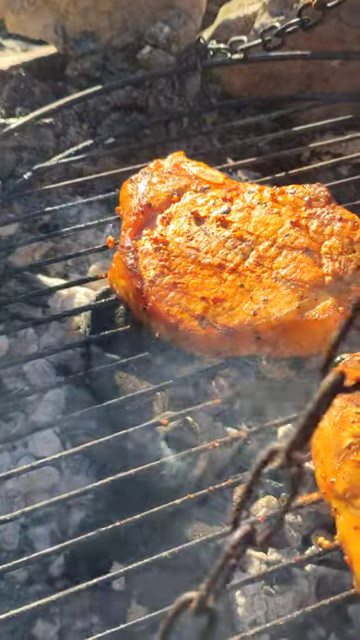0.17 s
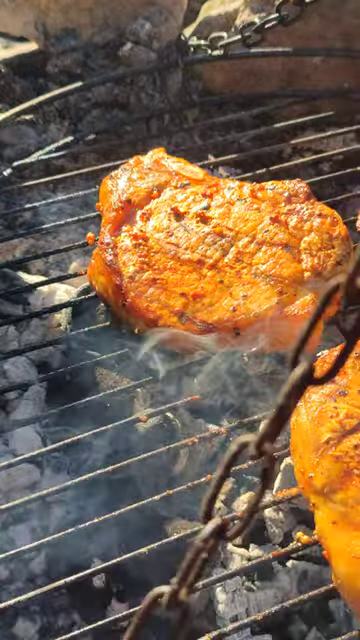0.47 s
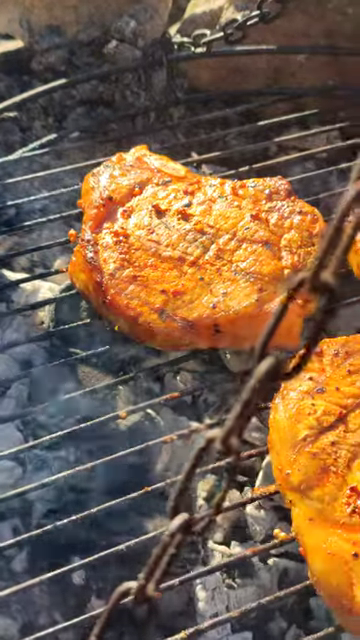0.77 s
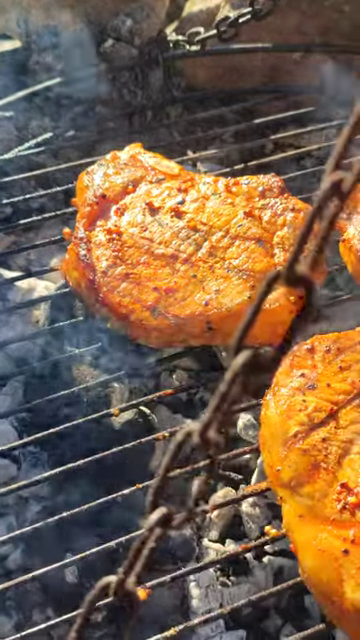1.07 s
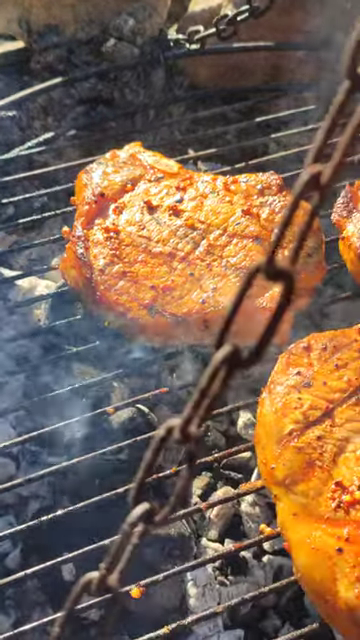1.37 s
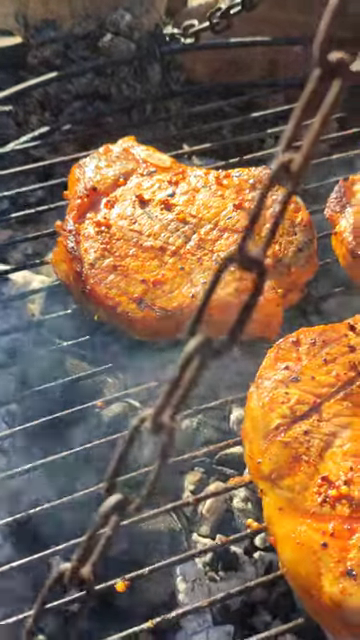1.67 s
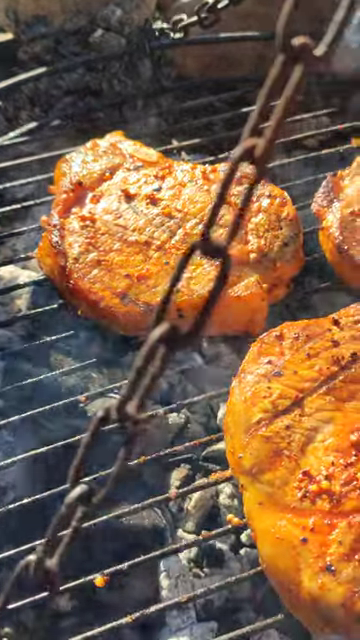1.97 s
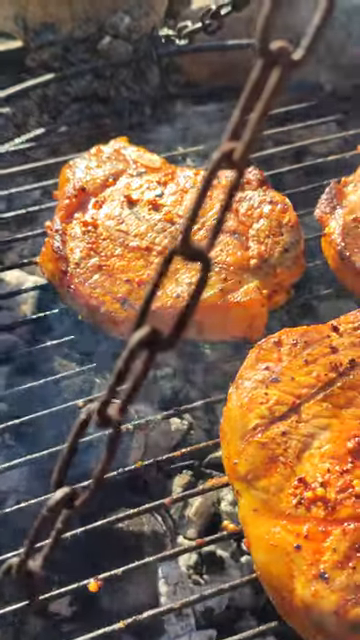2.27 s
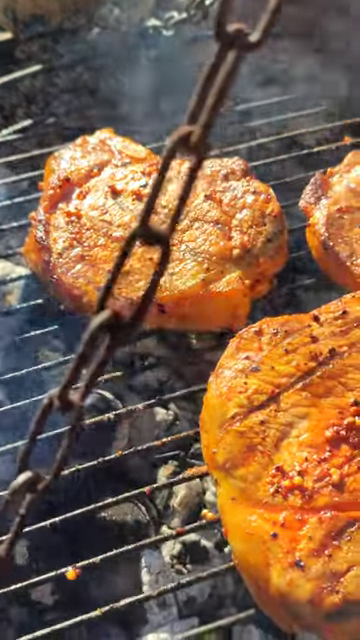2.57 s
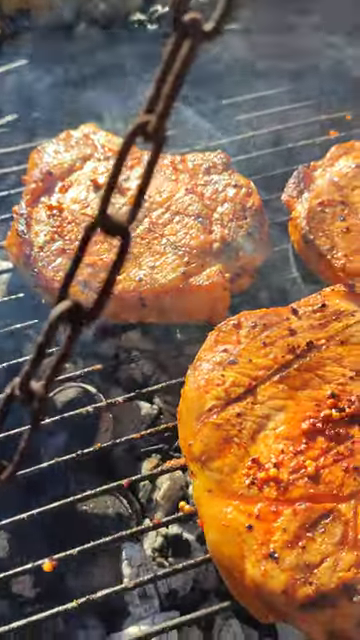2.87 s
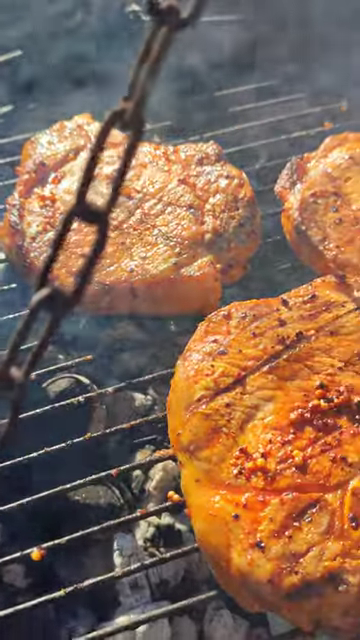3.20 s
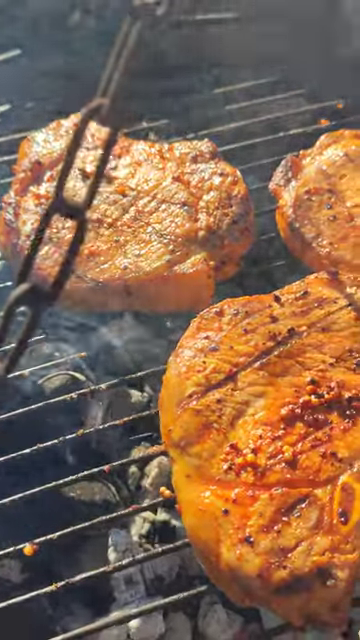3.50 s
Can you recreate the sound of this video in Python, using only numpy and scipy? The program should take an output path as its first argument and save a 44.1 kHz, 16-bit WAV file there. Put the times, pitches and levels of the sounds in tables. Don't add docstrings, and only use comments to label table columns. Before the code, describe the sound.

Meat sizzles on a charcoal grill outdoors, close to a stereo phone. After near silence until 0.1 s, it fades in by 0.35 s with a soft low thump. Fine bright fizz and crackle swell until about 1 s, with dense pops, sharpest at 0.55. Sizzle eases at 1.4-2.1, with sparser snaps, then revives from 2.3; a duller strong pop lands at 2.53, more around 2.8-3.15. Faint traffic rumbles throughout.

```python
import sys
import numpy as np
from scipy import signal
from scipy.fft import rfft, irfft, next_fast_len
from scipy.io import wavfile
from scipy.ndimage import uniform_filter1d, minimum_filter1d, map_coordinates

SR = 44100
rng = np.random.default_rng(int(sys.argv[2]) if len(sys.argv) > 2 else 0)


def how_loud(loudness_db):
    steps = np.asarray(loudness_db, float) / 20
    return 10 ** steps


def pcm_store(signal):
    levels = np.round(np.clip(np.atleast_2d(signal), -1, 1) * 32767)
    wavfile.write(sys.argv[1], SR, levels.astype(np.int16).T)


N = 160524

# time in seconds, strength in dB.
FRYING = [(.1, -59), (.25, -62), (.325, -60.5), (.36, -56), (.52, -57), (.7, -55.5), (.93, -57),
          (.97, -58.5), (1.3, -59), (1.44, -61.5), (1.7, -61.5), (2.149, -60.5), (2.33, -57), (2.45, -56.5),
          (2.7, -58.5), (2.95, -57), (3.2, -59.5), (3.32, -57.5), (3.55, -59)]
# frequency in Hz, level in dB.
FIZZ_COLOUR = [(500, -39), (1400, -15.5), (2100, -5), (4000, 1.5), (8000, -1.5), (12000, -0.5),
               (16000, -0.5)]
# centre in Hz, width in Hz, height in dB.
SINGING_BAND = [(7260, 1700, 21.5)]
# time in seconds, peak in dB, left over right in dB,
# treble above the air corner in dB, low body in dB.
BIG_POPS = [(0.3508, -32.5, 2, -1.5, 9), (0.441, -39, 0, -3, 1), (0.4799, -35.5, -1.5, -9, 3),
            (0.5468, -21.5, -3.5, 4.5, -5), (0.579, -30, 0, 6, 3), (0.6594, -33.5, -6, -3, -3),
            (0.6811, -31.5, -8, 1, -3), (0.6873, -34.5, -5, 3, -3), (0.7095, -42, -3, -4, 0),
            (0.7123, -30, -5, 0, 7), (0.7633, -28, -5.5, -1.5, 8), (0.7654, -34, 0, -2, 2),
            (1.2737, -29, 2, 6, 14.5), (1.2755, -32, -7, 8, 8), (1.366, -26.5, -1, 1.5, 1),
            (1.8626, -32.5, 1, 4, 0), (1.9666, -33, 12, 10, -5), (2.436, -34, 2, 3, 0),
            (2.4436, -28, -5, -4, 2), (2.4612, -29.5, 2, -4.5, 2), (2.526, -22, -2, -15, 0.5),
            (2.7934, -35, 7, 2, 0), (2.825, -30, 2, -3.5, 3), (2.8351, -32, -4, 0, -2),
            (2.973, -31.5, -4, -0.5, -2), (3.015, -26.5, -2.5, 0, -5), (3.072, -35.5, -10, 3, -3),
            (3.152, -36.5, -7, -1.5, -6), (3.6076, -35, -1, -1, 0)]
# time in seconds, peak in dB, brightness in dB per octave.
SMALL_POPS_EARLY = [(.1035, -33.5, 1), (.203, -39, -3.5), (.278, -40, -5), (.338, -48, -16), (.416, -38, 7),
                    (.526, -51, -8), (.584, -37, -4), (.597, -32, -1), (.612, -33.5, -5.5), (.622, -39, -5),
                    (.646, -42, -6), (.670, -42, 0), (.730, -49, 4), (.823, -41, -9), (.872, -39, -1.5),
                    (.915, -38, -4.5), (.980, -37, 4), (1.170, -44, -1), (1.228, -37.5, 2), (1.246, -43, 4),
                    (1.414, -46, 6), (1.432, -51, -2), (1.654, -43, -7), (1.659, -47, -1),
                    (1.845, -39, 1.5), (1.875, -38, -3)]
# time in seconds, peak in dB, brightness in dB per octave.
SMALL_POPS_LATE = [(2.051, -40, -6), (2.237, -40.5, -1), (2.372, -36.5, 0), (2.391, -42, 6),
                   (2.453, -40, 3), (2.470, -37, -1), (2.533, -48, 0), (2.586, -41, -2),
                   (2.659, -43.5, -7.5), (2.731, -37, -1), (2.745, -36.5, 3), (2.818, -36, -2),
                   (2.900, -44, -4), (2.962, -44, -4), (3.009, -38, -1), (3.025, -39, -2),
                   (3.089, -40, -1.5), (3.265, -39.5, -1.5), (3.313, -42.5, -3), (3.326, -36, 0),
                   (3.393, -39, 0), (3.435, -45, -7.5), (3.488, -44, 0), (3.621, -35.5, -2),
                   (3.629, -34.5, 2)]
# time in seconds, peak in dB, brightness in dB per
MORE_SMALL_POPS = [(.3557, -41, 1), (.3784, -42, 0), (.408, -39, 1), (.449, -44, 0), (.490, -45, 3), (.51, -40, 2),
                   (.5687, -42, 0), (.6362, -38, -7), (.7388, -40, -2), (.777, -45, -4), (.791, -40, -4),
                   (.8344, -44, -3), (.8464, -48, 6), (.8806, -40, -3), (.924, -44, -3), (.941, -46, -2)]
# frequency in Hz, level in dB.
POP_COLOUR = [(200, -18.5), (800, -13), (1400, -11), (2000, -3), (4000, 1), (8000, -0.5), (10500, -2.5),
              (14200, -5)]
# centre in Hz, width in Hz, height in dB.
LARGEST_CAVITY = [(600, 900, 6), (1400, 500, -6), (3150, 840, 5), (4860, 1800, -2), (7000, 460, -8),
                  (7600, 920, 6.5)]
# frequency in Hz, level in dB.
POP_EDGE = [(14100, 0.5), (15200, -36), (16000, -75)]
# centre in Hz, width in Hz, height in dB.
LEFT_PORT = [(2160, 1300, 5.5), (3180, 470, 4.5), (5520, 5400, 1), (6870, 1520, 5.5), (8370, 1300, 10.5),
             (13100, 3600, 4.5)]
# centre in Hz, width in Hz, height in dB.
RIGHT_PORT = [(2980, 1700, 4.4), (4300, 310, 0.53), (6160, 2480, 7.3), (7930, 810, 7.95),
              (12900, 5400, 3.6)]
# frequency in Hz, level in dB per Hz.
RUMBLE_COLOUR = [(8.8, -68), (15, 2), (35, -4), (59, -1.5), (214, -13), (255, -15.5), (303, -21),
                 (412, -21.5), (551, -24.5), (1500, -28.5), (1950, -35), (3300, -120)]
# centre in Hz, width in Hz, height in dB.
DRONES = [(54, 20, 3.5), (115, 19, 3.5), (249, 9.3, 2.5), (265.7, 13, 5.5), (432, 68, 2)]
# frequency in Hz, likeness from -1 to 1.
ALIKE = [(60, 0.93), (130, 1), (290, 0.75), (640, 0.6), (1410, -0.34), (3100, 1), (6820, -0.01),
         (15000, 0.0)]
# centre in Hz, width in Hz, extra chance (a factor).
HOLE_BANDS = [(3500, 2500, 4), (10000, 2000, 3)]
# height at full scale 1, time constant in seconds.
OFFSET = [
    (0.09, 0.15),
    (0.059, 0.07),
]
# time in seconds, jump at full scale 1.
JOLTS = [
    (0.085, 0.0014),
    (.145, -0.0057),
    (.205, -0.0033),
]


def fizz():
    own = rng.standard_normal((2, N))
    bubbles = crackle()
    hiss = how_loud(-2) * fizz_tone(steam(own))
    clicks = how_loud(-3.5) * fizz_tone(bubbles)
    both = how_loud(strength_db() - 0.7) * (hiss + clicks) + singing(bubbles, own)
    top_hz = 14300
    below_top = np.fft.rfftfreq(N, 1 / SR) < top_hz
    return irfft(rfft(coloured(both, ports_db)) * below_top, N)


def steam(own):
    shared_hz = 2270
    shared = coloured(rng.standard_normal(N), lambda hz: -10 * np.log10(1 + (hz / shared_hz) ** 4))
    hiss = patchy(own + 1.44 * shared, depth_db=3)
    return hiss * how_loud(0.32 * wobble(12) + 1.86 * wobble(40))


def crackle():
    per_s, size_spread_db, clump_db, spots = 900, 3.3, 3, 16
    chance, size, sign, place = rng.random((4, N))
    clumps = how_loud(clump_db * (0.46 * wobble(12) + wobble(30)))
    bursting = chance < per_s / SR * clumps
    sizes = bursting * how_loud(-size_spread_db * np.log(1 - .98 * size)) * np.sign(sign - .3)
    spot = (place * spots).astype(int)
    out = np.zeros((2, N))
    for k in range(spots):
        here = (sizes * (spot == k))[None]
        out += signal.oaconvolve(here, burst(t60=.006, scatter_db=-2.5, count=300), axes=1)[:, :N]
    return out


def singing(bubbles, own):
    from_db, level_db, grows = -56, -9.5, 1.06
    source = bubbles[::-1, ::-1] / 3 + 0.064 * own
    tiny = unit(coloured(source, lambda hz: bells(SINGING_BAND, hz)))
    return how_loud(from_db + level_db + (1 + grows) * (strength_db() - from_db)) * tiny


def fizz_tone(x):
    return unit(coloured(x, lambda hz: along(FIZZ_COLOUR, hz)))


def strength_db():
    s, db = np.transpose(FRYING)
    return np.interp(np.arange(N) / SR, s, db)


def pops():
    small = list(SMALL_POPS_EARLY) + list(SMALL_POPS_LATE) + list(MORE_SMALL_POPS)
    small = [(s, db, -3, 0, 0, tilt) for s, db, tilt in small]
    big = [(s + 0.00054, *rest, 0) for s, *rest in BIG_POPS]
    s, db, pan_db, air_db, body_db, tilt_db = np.transpose(big + small)

    t = np.arange(1400) / SR
    spray_db, spray_t60_s = -23, 0.027
    spray = how_loud(spray_db - 60 * t / spray_t60_s) * rng.standard_normal((len(s), 2, len(t))) * (t > .001)
    clicks = np.array([burst(t60=.009, scatter_db=-12, count=len(t)) for _ in s])
    grate_echo_s, grate_echo = .00042, .7
    clicks[:, 1, round(grate_echo_s * SR)] = grate_echo

    def column(values):
        return values[:, None, None]

    def pop_db(hz):
        body_hz, air_hz = 1700, 9000
        tilt = column(tilt_db) * np.log2((hz + 300) / 5000)
        body = column(body_db) / (1 + (hz / body_hz) ** 4)
        air = column(air_db) / (1 + (air_hz / (hz + 1)) ** 8)
        cavity = column(db == db.max()) * bells(LARGEST_CAVITY, hz)
        return along(POP_COLOUR, hz) + tilt + body + air + cavity + ports_db(hz)

    shaped = coloured(clicks + spray, pop_db)
    out = np.zeros((2, N + 4096))
    for start, level_db, lean_db, pop in zip(s, db, pan_db, shaped):
        gain = how_loud(level_db - 1 + lean(lean_db + 0.5))
        peak = np.abs(pop.mean(axis=0)).max()
        out[:, round(start * SR):][:, :len(t)] += gain * pop / peak
    edge = how_loud(along(POP_EDGE, np.fft.rfftfreq(N, 1 / SR)))
    return irfft(rfft(out[:, :N]) * edge, N)


def burst(t60, scatter_db, count):
    t = np.arange(count) / SR
    shape = how_loud(scatter_db - 60 * t / t60) * rng.standard_normal((2, count)) * (t > .00025)
    left_direct, left_lag_s = .6, .00055
    shape[:, 0] = left_direct, 1
    shape[0, round(left_lag_s * SR)] = 1
    return shape


def ports_db(hz):
    return np.array([bells(LEFT_PORT, hz), bells(RIGHT_PORT, hz) + 2])


def traffic():
    level_db, lean_db = -53, -0.7
    hz = np.fft.rfftfreq(N, 1 / SR)
    turn = np.arccos(np.clip(along(ALIKE, hz), -1, 1)) / 2
    gain = how_loud(along(RUMBLE_COLOUR, hz) + bells(DRONES, hz)) * [np.cos(turn), np.sin(turn)]
    mid, side = irfft(rfft(rng.standard_normal((2, N))) * gain, N)
    rumble = unit(np.array([mid + side, mid - side]))
    return how_loud(level_db + 0.53 * wobble(2.5)) * rumble * how_loud(lean(lean_db))


def unit(x):
    return x / np.sqrt(np.mean(x ** 2) + 1e-20)


def lean(db):
    return np.array([[.5], [-.5]]) * db


def along(points, hz):
    f, v = np.transpose(points)
    return np.interp(np.log(hz + 1), np.log(f + 1), v)


def bells(peaks, hz):
    return sum(height * np.exp(-(2 * (hz - c) / w) ** 2) for c, w, height in peaks)


def wobble(rate):
    knots = rng.standard_normal(int(N * rate / SR) + 4)
    return map_coordinates(knots, [np.arange(N) * rate / SR])


def coloured(x, gain_db):
    m = next_fast_len(x.shape[-1] + 2048)
    floored_db = np.maximum(gain_db(np.fft.rfftfreq(m, 1 / SR)), -80)
    cep = irfft(np.log(how_loud(floored_db)), m)
    cep[..., 1:m // 2] *= 2
    cep[..., m // 2 + 1:] = 0
    return irfft(rfft(x, m) * np.exp(rfft(cep)), m)[..., :x.shape[-1]]


def patchy(x, depth_db):
    z = signal.stft(x, nperseg=512)[2]
    field = uniform_filter1d(rng.standard_normal(z.shape), size=3, axis=1)
    field = uniform_filter1d(field, size=6, axis=2)
    return signal.istft(z * how_loud(depth_db * unit(field)), nperseg=512)[1][:, :N]


def scene():
    return fizz() + pops() + traffic()


def band_dropouts(x):
    chance, depth_db = .0003, -35
    hz, _, z = signal.stft(x, SR, nperseg=1024)
    likely = chance * (1 + bells(HOLE_BANDS, hz))[:, None]
    kept = 1.0 * ((rng.random(z.shape[1:]) > likely) | (hz[:, None] < 2200))
    kept = minimum_filter1d(minimum_filter1d(kept, size=7, axis=0), size=5, axis=1)
    return signal.istft(z * how_loud(depth_db * (1 - kept)), nperseg=1024)[1][:, :N]


def settling_offset(t, on):
    offset = np.array([height * on / tau * np.exp(-on / tau) * np.minimum(tau / 0.31, 1)
                       for height, tau in OFFSET])
    jolts = sum(jump * (t >= s) * np.exp(-np.abs(t - s) / 0.02) for s, jump in JOLTS)
    jolts = jolts * np.array([[1], [.3]])
    return offset + uniform_filter1d(jolts, size=6)


def roll_off(x):
    return signal.sosfilt(signal.butter(12, 15610, fs=SR, output="sos"), x)


def record(dry):
    start_s, fade_s, fade_power, fade_from = 0.082, 0.26, 0.75, 0.044
    t = np.arange(N) / SR
    on = np.maximum(t - start_s, 0)
    rise = np.minimum(on / fade_s, 1) ** fade_power
    fade = (on > 0) * (fade_from + (1 - fade_from) * rise)
    mix = band_dropouts(dry) * fade + settling_offset(t, on)
    return roll_off(mix)


dry = scene()
out = record(dry)
pcm_store(out)
```